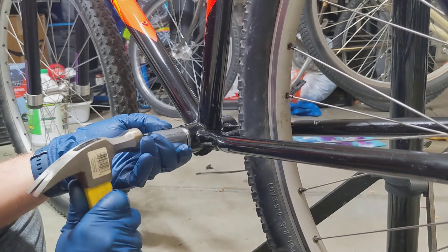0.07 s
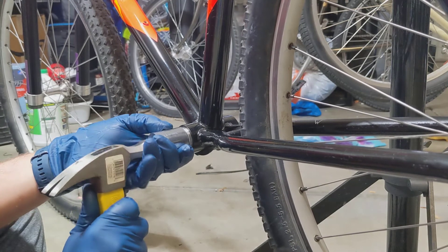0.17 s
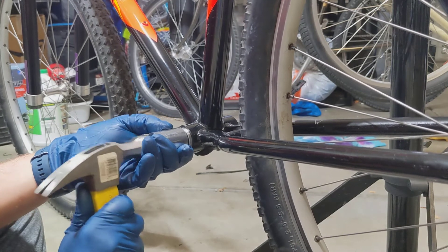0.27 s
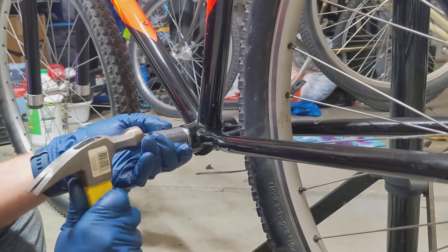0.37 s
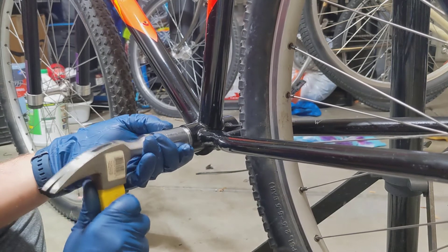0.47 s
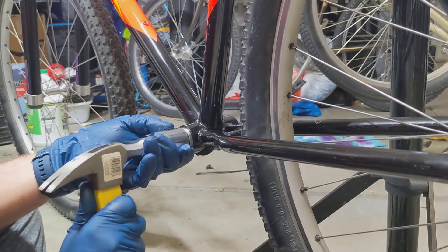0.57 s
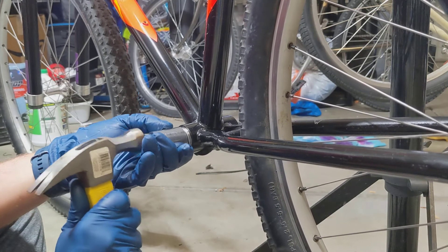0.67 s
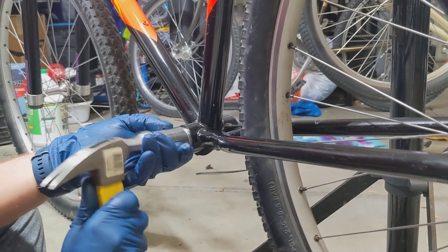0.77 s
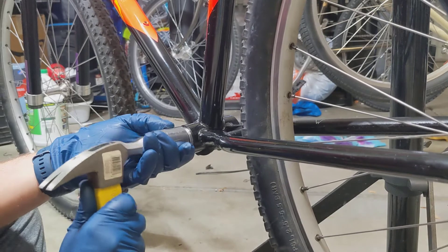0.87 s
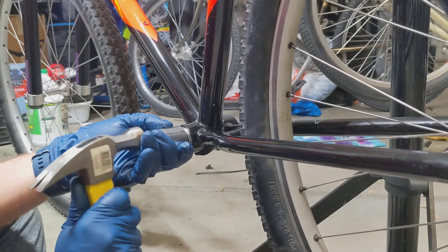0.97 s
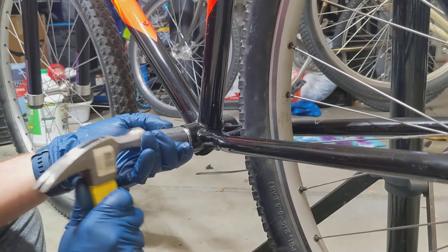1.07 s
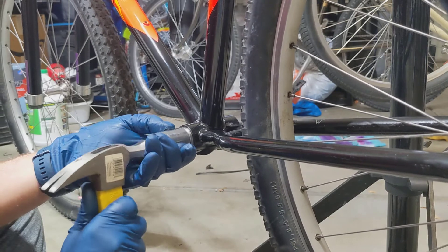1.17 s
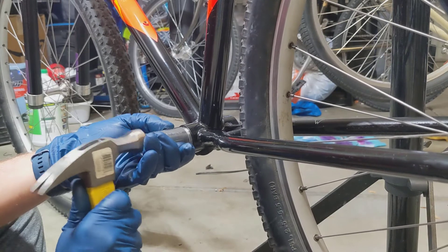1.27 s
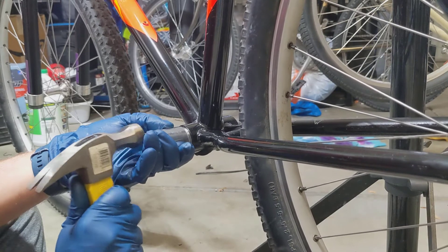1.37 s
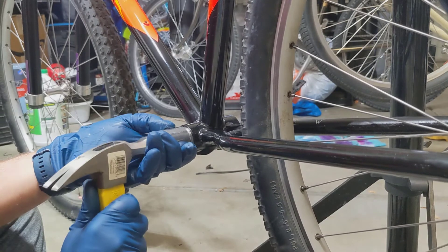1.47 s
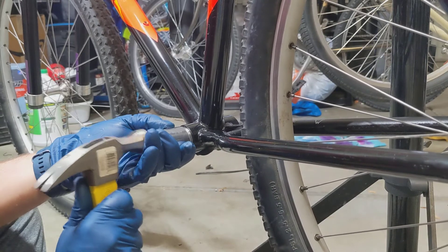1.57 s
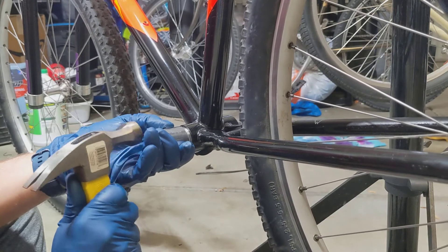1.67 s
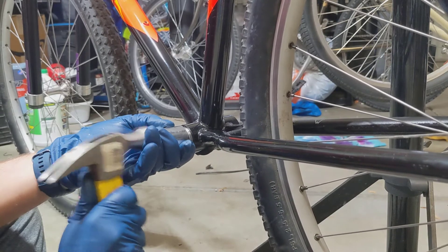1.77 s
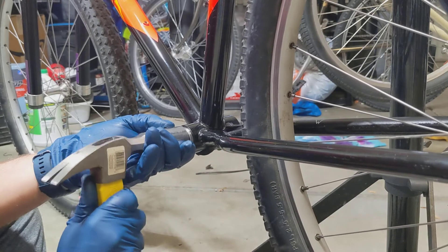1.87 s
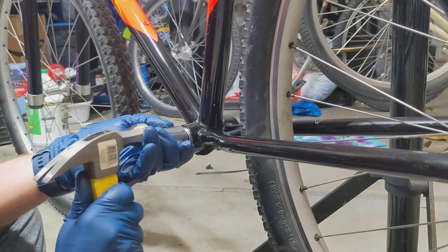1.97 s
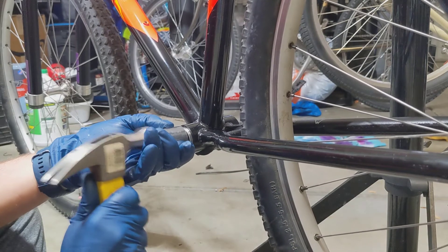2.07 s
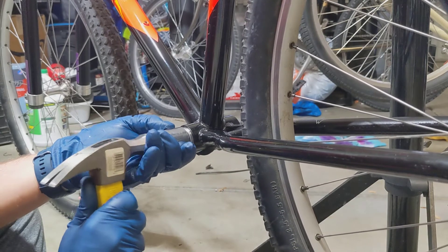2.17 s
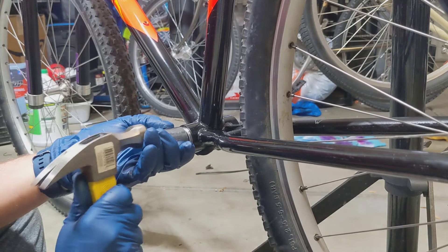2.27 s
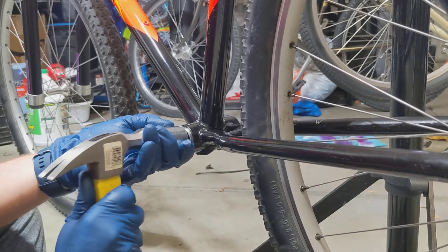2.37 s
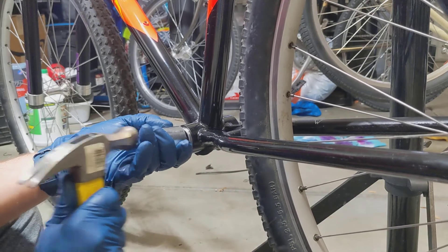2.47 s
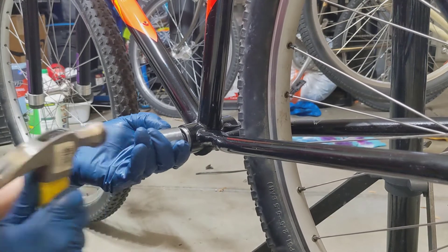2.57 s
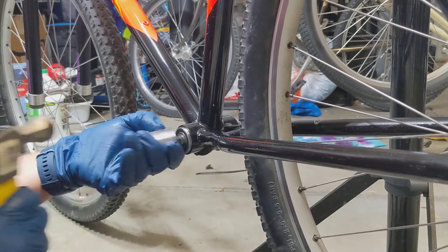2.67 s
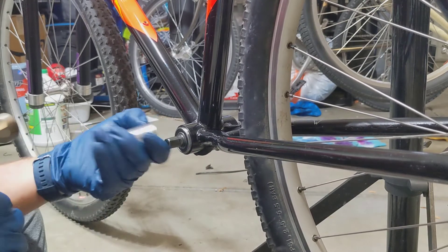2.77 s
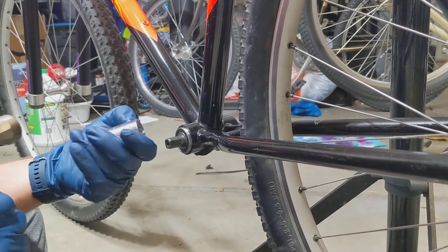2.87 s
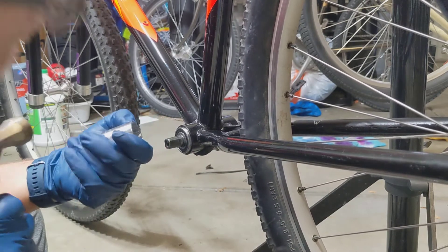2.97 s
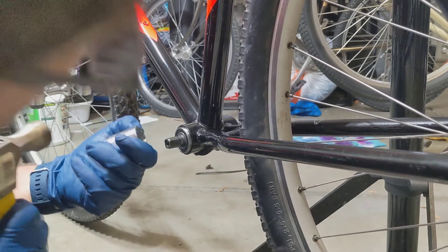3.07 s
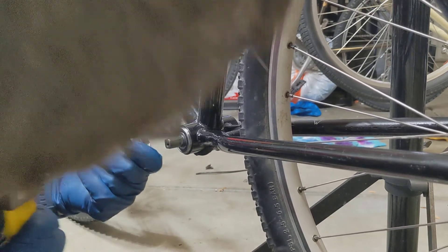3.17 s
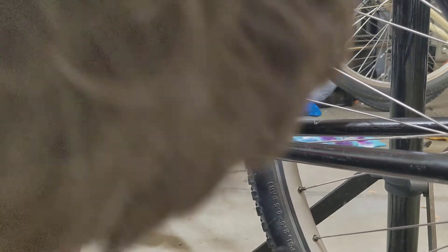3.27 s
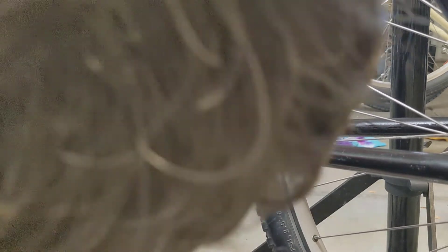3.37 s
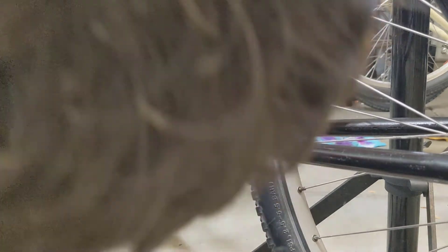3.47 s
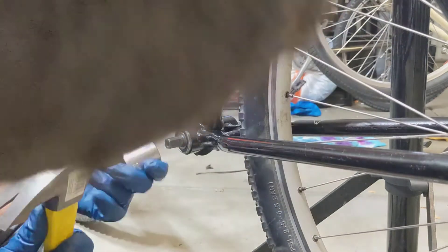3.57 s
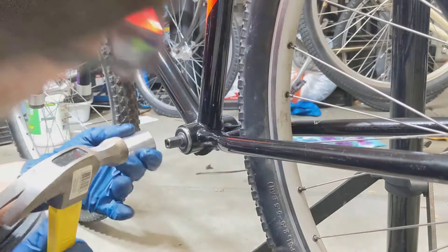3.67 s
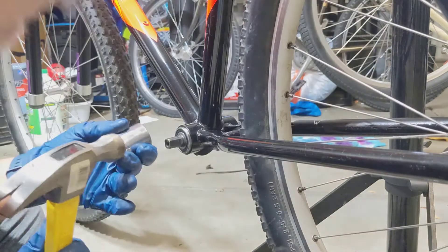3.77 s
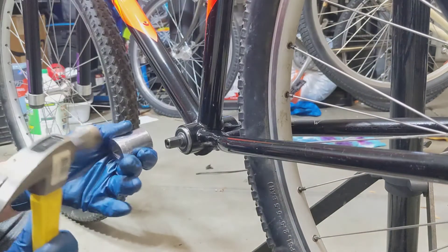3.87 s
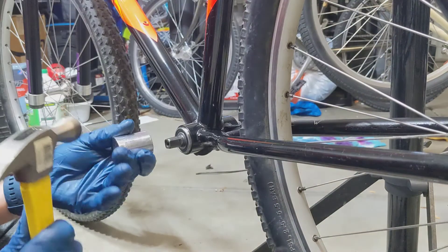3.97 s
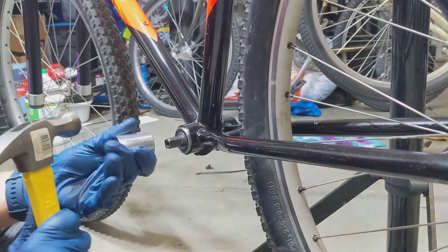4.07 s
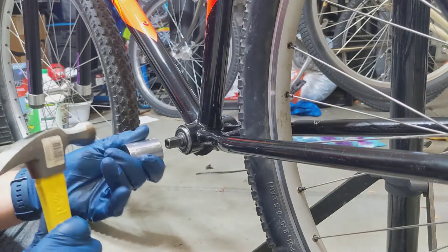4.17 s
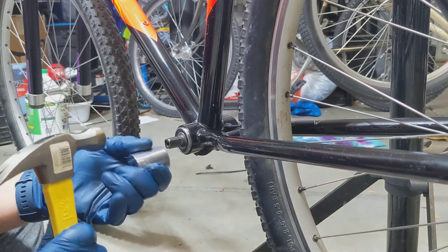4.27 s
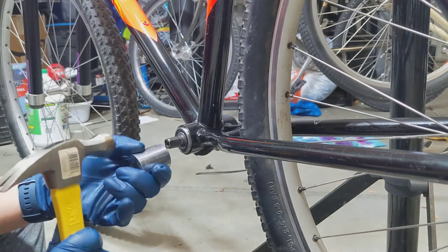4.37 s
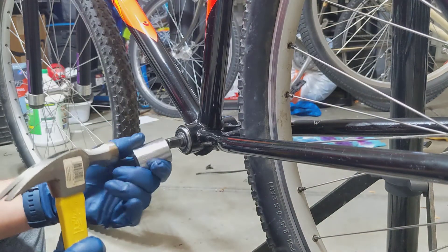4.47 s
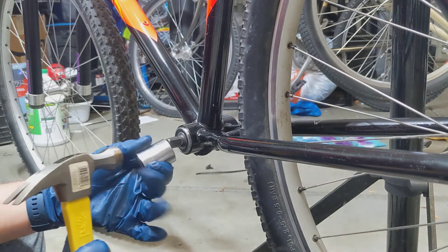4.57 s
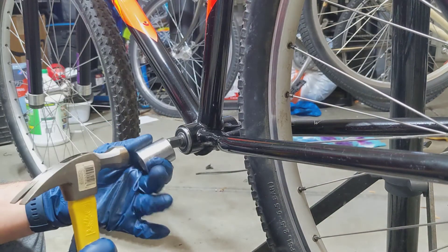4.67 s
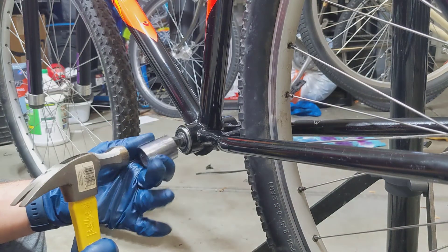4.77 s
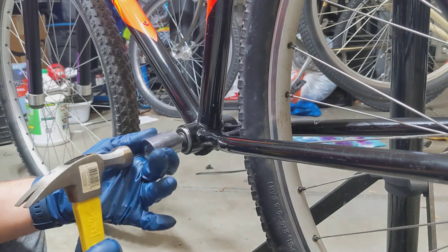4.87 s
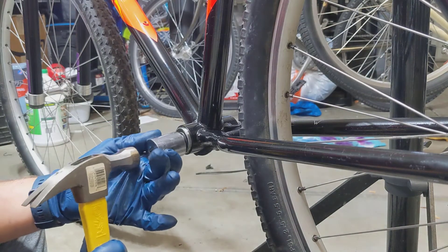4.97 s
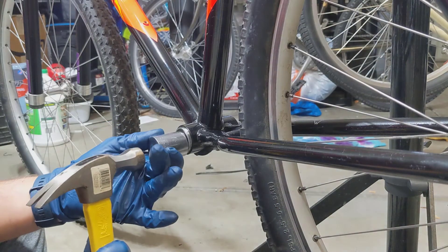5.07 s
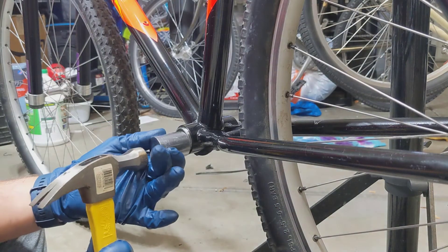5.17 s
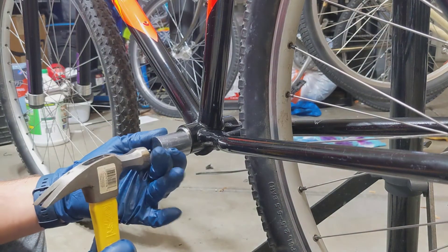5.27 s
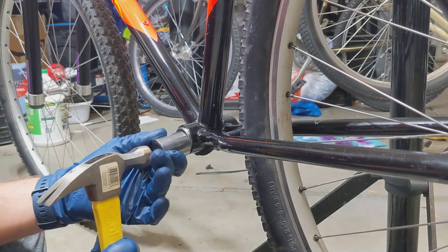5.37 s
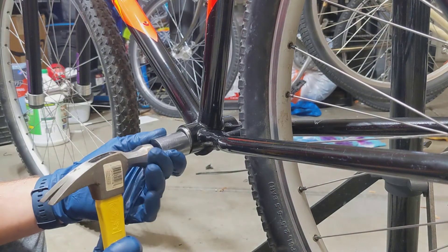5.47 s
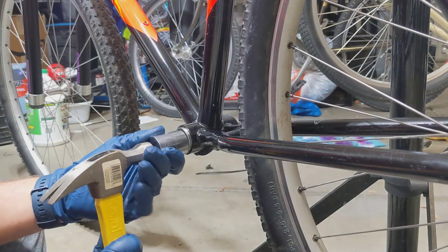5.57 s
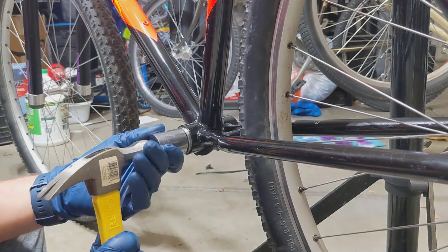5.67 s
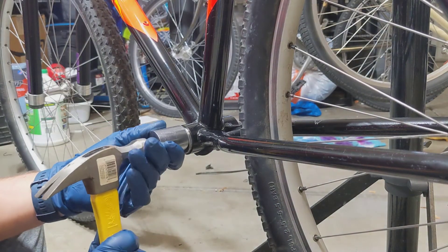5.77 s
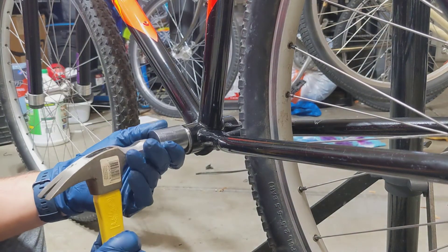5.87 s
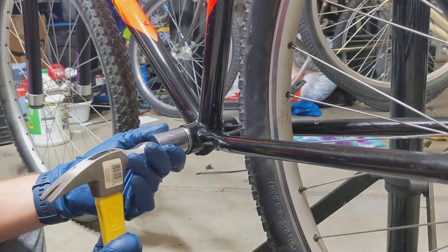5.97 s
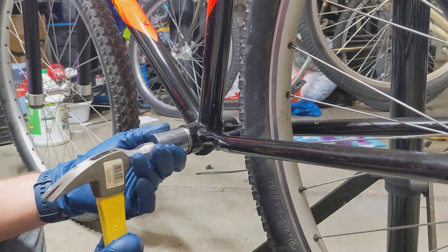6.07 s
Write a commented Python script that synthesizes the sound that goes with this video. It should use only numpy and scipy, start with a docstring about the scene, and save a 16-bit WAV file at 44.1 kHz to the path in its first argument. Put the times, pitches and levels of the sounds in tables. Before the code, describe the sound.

Sharp, ringing steel taps on a bicycle frame in steady rhythm, a pause with faint glove brushes, then small clinks and rattles of a socket.

```python
"""Sharp hammer taps first: a steel socket in a gloved hand is struck against a bicycle's bottom bracket.
Each tap is a coloured noise crack plus decaying sines for steel and frame, a noise thud and slow low room modes.
The socket is pulled off with clinks; a few soft glove swishes follow in the pause.
It is then fitted back with light clinks (noise bursts, spindle and socket sines) and tiny noise ticks.
A faint room noise, low rumble and hiss, lies underneath."""
import sys
import numpy as np
from scipy import signal
from scipy.fft import rfft, irfft, next_fast_len
from scipy.io import wavfile

SR = 44100
rng = np.random.default_rng(int(sys.argv[2]) if len(sys.argv) > 2 else 0)


def waveform_to_disk(signal):
    """Save audio, clipped to [-1, 1], as 16-bit WAV at the path in sys.argv[1]."""
    frames = np.transpose(np.atleast_2d(signal))
    scaled = np.clip(frames, -1, 1) * 32767
    samples = np.round(scaled).astype(np.int16)
    wavfile.write(sys.argv[1], SR, samples)


N = 269010
LEAD = SR // 4  # run-up in samples: the tapping is already under way
SIDES = np.array([[1], [-1]]) / 2  # half of a left-right difference to each ear

# Hammer taps: t/s, level/dB, seating (-1 askew to 1 square), favoured frame resonance f/Hz, steel ring/dB
TAPS = [(-.035, -31.5, -0.63, 1950, -5.5), (.286, -31.5, -0.31, 2250, 0), (.602, -34.5, 0.98, 4180, -0.5),
        (.902, -30, -0.56, 3600, -6.5), (1.234, -32, -0.14, 2880, -3.5), (1.5579, -33, -0.12, 2230, 2),
        (1.91, -32, -0.046, 3160, 3), (2.207, -34.5, 0.54, 4580, -7), (2.441, -31, -0.53, 2850, -3)]
# Hammer head and socket pressed together: f/Hz, level/dB, t60/s, left-right/dB, left lead/rad
STEEL_MODES = [(6445, 0, .08, -1, 1.9), (6945, 3, .065, 5, 2.7), (11665, -18, .06, -3, 0),
               (6340, -3, .02, -2, 1.6), (7150, -9, .012, 0, 2.4), (9000, -12, .015, -3, 0),
               (9270, -12.5, .035, -3, .3)]
# Bicycle frame tubes: f/Hz, level/dB, t60/s
FRAME_MODES = [(365, -7, 0.52), (477.6, -7.5, 0.15), (667, -9, 0.35), (769, -4.5, 0.096), (843, -30, 0.076),
               (1064, 5.5, 0.082), (1384, -3, 0.31), (1610, -4, 0.31), (1970, 0.5, 0.11), (2067, 0.5, 0.32),
               (2104, 3.5, 0.083), (2370, 1, 0.072), (2770, 0, 0.24), (2626, -14, 0.35), (3025, -6.5, 0.54),
               (3100, -13, .25), (4460, 0, 0.14), (4160, -22, 0.12), (4840, 1, 0.12), (11200, -7, 0.12)]
# Low room modes: f/Hz, level/dB, t60/s, delay/s
ROOM_MODES = [(61.3, -3.5, 0.41, 0.015), (159.35, -1, 0.47, 0.01756), (177.4, -7.5, 0.42, 0.0185),
              (270, -11.5, 0.47, 0.0079)]
# Crack of a tap, relative spectrum: f/Hz, level/dB per Hz
CRACK_SPECTRUM = [(100, -50), (300, -27), (600, -5), (1000, -1.5), (1350, -3.5), (2200, 1), (3300, -2.5),
                  (4600, -6), (5500, -4), (6600, 6.5), (7900, -10.5), (9200, -7.5), (11500, -9),
                  (15500, -13.5)]
# Shudder of the bicycle, relative spectrum: f/Hz, level/dB per Hz
THUD_SPECTRUM = [(30, -2), (60, -1.5), (100, -6.5), (135, -3.5), (172, 12.5), (220, -2), (290, -1),
                 (450, -6.5), (800, -9), (2000, -99)]
# Room noise, relative spectrum: f/Hz, level/dB per Hz
AIR_SPECTRUM = [(12, -34), (20, 2), (65, -9), (81, -12), (192, -18.5), (244, -20), (356, -21), (441, -23),
                (736, -24.5), (1230, -26.5), (2470, -28), (4460, -29), (10300, -30.5), (12400, -30.5),
                (16100, -41), (22000, -120)]
# Socket against spindle: t/s, level/dB, knock resonance f/Hz, contacts in the rattle/count
CLINKS = [(2.612, -50.5, 960, 1), (2.829, -36, 1750, 1), (4.657, -41, 2550, 1), (4.848, -48.5, 2330, 3),
          (5.004, -42, 1640, 2), (5.021, -41, 1630, 1), (5.057, -48.5, 1770, 2), (5.113, -46.5, 2290, 1),
          (5.135, -44.5, 2030, 1), (5.163, -49, 2000, 1), (5.23, -53, 2000, 1), (5.319, -54.5, 1730, 1),
          (5.515, -48, 1840, 1), (5.904, -60, 2000, 1), (6, -52, 1990, 1)]
# Socket depth on the spindle: t/s, depth (0 loose to 1 home)
SOCKET_DEPTH = [(2.6, 1), (2.83, .65), (2.95, 0), (5.005, 0), (5.02, .3), (5.24, .45), (5.32, 1)]
# Loose socket: f/Hz, level/dB, t60/s
SOCKET_MODES = [(9210, 0, .15), (9300, -1, .2), (11600, -15, .1)]
# Spindle under a light knock, before extra damping: f/Hz, level/dB, t60/s
SPINDLE_MODES = [(793, -4, 0.062), (1067, 0, 0.17), (1612, -8, 0.36), (2005, 5, 0.11), (2200, -4.5, 0.21),
                 (2270, 6, 0.12), (2910, 0.5, 0.39)]
# Light contact, relative spectrum: f/Hz, level/dB per Hz
CLINK_SPECTRUM = [(150, -45), (450, -10.5), (750, -3), (1100, 5), (1350, -3.5), (1650, 4), (2300, 0),
                  (2900, -3), (5000, -11.5), (6500, -23.5), (12000, -23.5), (16000, -75)]
# Glove brushing the socket: t/s, level/dB
BRUSHES = [(3.11, -66.5), (4.085, -64), (4.318, -64)]
# Rubber on steel, relative spectrum: f/Hz, level/dB per Hz
GLOVE_SPECTRUM = [(200, -5), (900, 1), (2000, -7), (4200, 1), (6500, -2), (12000, -11), (15000, -25)]
# Left-right likeness of room noise and glove: f/Hz, likeness (-1 to 1)
AIR_LIKENESS = [(60, 0.94), (180, 0.98), (550, 0.98), (1650, 0.94), (4970, 0.97), (15000, 1)]
# Left-right likeness of echoes and thud: f/Hz, likeness (-1 to 1)
ECHO_LIKENESS = [(150, 0.68), (500, 1), (1000, -0.58), (2000, -0.48), (6000, 0.3), (12000, 0.034)]
# Left-right likeness of direct contacts: f/Hz, likeness (-1 to 1)
DIRECT_LIKENESS = [(200, 1), (900, 0.47), (2200, -0.42), (5000, -0.021), (6700, 0.75), (10000, .15)]
# Decay of the workshop's echoes: f/Hz, t60/s
ECHO_DECAY = [(150, 1.5), (600, 0.5), (2200, 0.45), (4500, 0.4575), (7000, 0.41), (11000, 0.26),
              (15500, 0.15)]
# Colour of the workshop's echoes: f/Hz, level/dB
ECHO_COLOUR = [(150, -3.5), (900, 1), (2200, 1), (4500, 2.5), (6700, -8.5), (9000, 2.5), (15000, 3)]

# A square blow: harder knock, brighter, more favoured resonance. dB at seating 0, dB per unit of seating
KNOCK_DB, KNOCK_SEATING_DB = 0, 4.5
BRIGHT_DB, BRIGHT_SEATING_DB = 3, 4.5
LIFT_DB, LIFT_SEATING_DB = 8, 5.5
LOW_DB, LOW_SEATING_DB = -0.7, 2.4  # shudder and boom
MID_RUN_S, KNOCK_DB_PER_S, BRIGHT_DB_PER_S = 1.2, -1, 1.5  # drift about mid-run
FRAME_LIFT_SHARE, FRAME_KNOCK_SHARE = 0.26, 0.28  # share of lift and knock reaching the frame ring
RATTLE_GAP_S, RATTLE_LOSS_DB = 0.0082, 1.3  # per contact of a rattle
DEPTH_DULLS_DB, DEPTH_MUTES_DB = -7.5, -25  # contact treble and socket ring, fully home
SOCKET_DB = -11.5
# Treble of a loose contact at FIRM_DB; treble dB gained per dB below it
FIRM_DB, FIRM_TREBLE_DB, GRAZE_THINS = -42, 6.5, 0.24
TOP_HZ = 16200


def amp(db):
    """Decibels to gain."""
    return 10 ** (np.asarray(db) / 20)


def unit(x):
    """Scale to rms 1."""
    return x / np.sqrt(np.mean(x ** 2) + 1e-20)


def along(points, hz):
    """Read (Hz, value) points on a log-frequency axis."""
    f, value = np.transpose(points)
    return np.interp(np.log(hz + 1), np.log(f + 1), value)


def filtered(x, response):
    """Multiply the spectrum of x by a function of frequency."""
    n = x.shape[-1]
    padded = next_fast_len(n + 4096)
    spectrum = rfft(x, padded) * response(np.fft.rfftfreq(padded, 1 / SR))
    return irfft(spectrum, padded)[..., :n]


def noise(size, spectrum, likeness):
    """Stereo noise of rms 1: mid and side shares set the left-right likeness."""
    def mid_side_gain(hz):
        angle = np.arccos(np.clip(along(likeness, hz), -.99, .99)) / 2
        return amp(along(spectrum, hz)) * [np.cos(angle), np.sin(angle)]

    mid, side = filtered(rng.standard_normal((2, size)), mid_side_gain)
    return unit(np.array([mid + side, mid - side]))


def fade(t, t60_s):
    """Exponential decay from t = 0, -60 dB at t60."""
    return np.exp(-np.log(1000) * np.maximum(t, 0) / t60_s) * (t >= 0)


def resonance(hz, centre_hz, width):
    """Bell from 0 to 1; half-width is a share of the centre."""
    return 1 / (1 + ((hz / centre_hz - 1) / width) ** 2)


def ring(modes, t, scatter_db=2.5):
    """Damped modes: new strengths for each blow, another phase at each ear."""
    total = 0
    for hz, db, t60_s in modes:
        strength = amp(db + scatter_db * rng.standard_normal())
        phase = 2 * np.pi * (hz * t + rng.random((2, 1)))
        total = total + strength * fade(t, t60_s) * np.sin(phase)
    return total


def empty_track():
    """Silent stereo track with run-up and room for tails."""
    return np.zeros((2, LEAD + N + SR))


def add(track, s, sound):
    """Mix a sound into the track at time s."""
    i = LEAD + round(s * SR)
    track[:, i:i + sound.shape[1]] += sound


def workshop(x, wet_db, build_s=0.00043):
    """Direct sound plus a noise-tail room answer whose decay time depends on frequency."""
    white = noise(x.shape[1], [(100, 0.0038), (10000, 0)], ECHO_LIKENESS)
    hz, t, bins = signal.stft(white, SR, nperseg=256)
    envelope = fade(t, along(ECHO_DECAY, hz)[:, None]) * (1 - np.exp(-t / build_s))
    tail = signal.istft(bins * envelope, SR, nperseg=256)[1]
    tail = tail / np.sqrt(np.sum(tail ** 2) / 2)  # mean energy 1 per ear
    tail = filtered(tail, lambda f: amp(along(ECHO_COLOUR, f)))
    return x + amp(wet_db) * signal.fftconvolve(x, tail, axes=1)[:, :x.shape[1]]


def crack(t, tilt, lift, level_db=10, t60_s=0.049, pan_db=-2.5):
    """Steel meets steel: dense short modes as decaying coloured noise."""
    burst = noise(len(t), CRACK_SPECTRUM, DIRECT_LIKENESS)
    burst = filtered(burst, lambda hz: amp(along(tilt, hz) + lift(hz)))
    return amp(level_db) * burst * fade(t, t60_s) * amp(pan_db * SIDES)


def ping(t):
    """Hammer head and socket ring together, strongly damped by the grip."""
    steel = 0
    for hz, db, t60_s, pan_db, lead_rad in STEEL_MODES:
        phase = 2 * np.pi * (hz * t + rng.random()) + SIDES * lead_rad
        strength = amp(db + SIDES * pan_db + rng.standard_normal())
        steel = steel + strength * fade(t, t60_s) * np.sin(phase)
    return steel


def frame_ring(t, tilt, lift, level_db=-9.0, pan_db=-2.0):
    """Frame tubes ring as damped modes, driven by part of the blow's colour."""
    def drive(hz):
        return FRAME_LIFT_SHARE * lift(hz) + FRAME_KNOCK_SHARE * along(tilt, hz)

    modes = [(hz, db + drive(hz), t60_s) for hz, db, t60_s in FRAME_MODES]
    return amp(level_db + pan_db * SIDES) * ring(modes, t)


def shudder(t, level_db=-15.5, t60_s=0.82, rise_t60_s=0.073):
    """The whole bicycle shudders on its stand: low noise that swells, then decays."""
    rumble = noise(len(t), THUD_SPECTRUM, ECHO_LIKENESS)
    return amp(level_db) * rumble * fade(t, t60_s) * (1 - fade(t, rise_t60_s))


def boom(t, rise_t60_s=0.055, pan_db=-5.5):
    """Standing waves need a few crossings of the room to build up."""
    low = 0
    for hz, db, t60_s, delay_s in ROOM_MODES:
        age = np.maximum(t - delay_s, 0)
        strength = amp(db + rng.standard_normal())
        swell = fade(age, t60_s) * (1 - fade(age, rise_t60_s))
        low = low + strength * swell * np.sin(2 * np.pi * hz * (age - .012))
    return low * amp(pan_db * SIDES)


def taps(steel_db=11.0, boom_db=-10, contact_s=0.000083):
    """Each blow: crack and ping with echoes, frame ring, shudder, late boom; seating sets the colour."""
    track, t = empty_track(), np.arange(SR * 3 // 4) / SR
    for s, db, seating, favoured_hz, ping_db in TAPS:
        since_mid_s = s - MID_RUN_S
        knock_db = KNOCK_DB + KNOCK_SEATING_DB * seating + KNOCK_DB_PER_S * since_mid_s
        bright_db = BRIGHT_DB + BRIGHT_SEATING_DB * seating + BRIGHT_DB_PER_S * since_mid_s
        tilt = [(900, knock_db), (1900, 0), (6500, 0), (10000, bright_db)]  # f/Hz, level/dB
        lift_db = LIFT_DB + LIFT_SEATING_DB * seating
        lift = lambda hz: lift_db * resonance(hz, favoured_hz, width=0.12)
        metal = crack(t, tilt, lift) + amp(steel_db + ping_db) * ping(t)
        metal = metal * (1 - np.exp(-t / contact_s))
        frame = frame_ring(t, tilt, lift)
        low = shudder(t) + amp(boom_db) * boom(t)
        low = amp(LOW_DB + LOW_SEATING_DB * seating) * low
        add(track, s, amp(db) * (workshop(metal, wet_db=-2.5) + frame + low))
    return track


def room_noise(level_db=-60.5, hiss_top_hz=12500, above_db=-11, cut_hz=15400):
    """Steady low rumble and soft hiss that thins out at the very top."""
    def thinning(hz):
        return amp(above_db * np.clip((hz - hiss_top_hz) / 300, 0, 1)) * (hz < cut_hz)

    air = filtered(noise(N, AIR_SPECTRUM[:-1], AIR_LIKENESS), thinning)
    return amp(level_db) * unit(air)


def clinks(contact_db=2.5, contact_t60_s=0.045, lift_db=7, damping_s=0.043, spindle_db=-3,
           pick_db=9, rise_s=0.00091):
    """Socket knocks and rattles on the spindle; its ring mutes and contacts dull as it slides home."""
    track, t = empty_track(), np.arange(SR // 2) / SR
    for s, db, knock_hz, contacts in CLINKS:
        depth = np.interp(s, *np.transpose(SOCKET_DEPTH))
        treble_db = FIRM_TREBLE_DB + GRAZE_THINS * (FIRM_DB - db) + DEPTH_DULLS_DB * depth ** 2
        # the contact point picks one spindle resonance and weakens the others
        near = lambda hz: resonance(hz, knock_hz, width=0.15)
        colour = lambda hz: amp(along([(2300, 0), (5000, treble_db)], hz) + lift_db * near(hz))
        modes = [(hz, level - pick_db * (1 - near(hz)), t60_s) for hz, level, t60_s in SPINDLE_MODES]
        socket = amp(SOCKET_DB + DEPTH_MUTES_DB * depth) * ring(SOCKET_MODES, t)
        add(track, s, amp(db) * workshop(socket, wet_db=-5))
        for k in range(round(contacts)):
            burst = filtered(noise(len(t), CLINK_SPECTRUM, DIRECT_LIKENESS), colour)
            burst = burst * fade(t, contact_t60_s) * (1 - np.exp(-t / rise_s))
            spindle = amp(spindle_db) * ring(modes, t) * np.exp(-t / damping_s)
            knock = workshop(burst, wet_db=-5.5, build_s=0.0037) + spindle
            knock_db = db + contact_db - RATTLE_LOSS_DB * k
            add(track, s + k * RATTLE_GAP_S, amp(knock_db) * knock)
    return track


def glove(offset_db=4.0, t60_s=0.15, rise_t60_s=0.0081):
    """Rubber on steel: short swishes of noise with a soft onset."""
    track, t = empty_track(), np.arange(SR // 4) / SR
    for s, db in BRUSHES:
        swish = noise(len(t), GLOVE_SPECTRUM, AIR_LIKENESS)
        swish = swish * fade(t, t60_s) * (1 - fade(t, rise_t60_s))
        add(track, s, amp(db + offset_db) * swish)
    return track


def handling(level_db=-64, spread_db=5, t60_s=0.044, count=14, start_s=4.7, span_s=1.35):
    """Tiny noise ticks as the gloved hand works the socket onto its seat."""
    track, t = empty_track(), np.arange(SR // 4) / SR
    for when, size in rng.random((count, 2)):
        tick = noise(len(t), CLINK_SPECTRUM, DIRECT_LIKENESS) * fade(t, t60_s)
        add(track, start_s + span_s * when, amp(level_db + spread_db * size) * tick)
    return track


def scene():
    """Taps, clinks, glove and handling over the quiet workshop."""
    events = taps() + clinks() + glove() + handling()
    return events[:, LEAD:LEAD + N] + room_noise()


def record(dry, ceiling=.3):
    """Round off the highest peaks below the ceiling, then cut steeply above TOP_HZ."""
    rounded = dry / (1 + (dry / ceiling) ** 4) ** (1 / 4)
    return filtered(rounded, lambda hz: 1 / (1 + (hz / TOP_HZ) ** 120))


dry = scene()
out = record(dry)
waveform_to_disk(out)
```